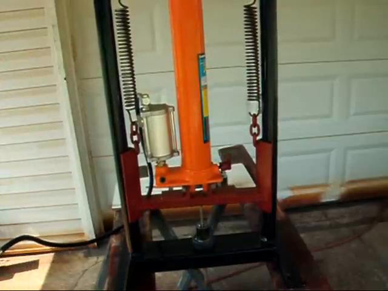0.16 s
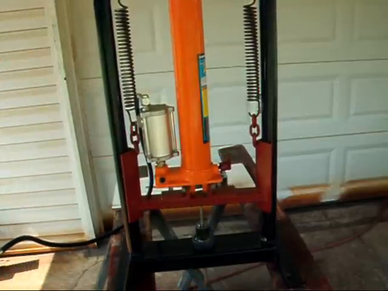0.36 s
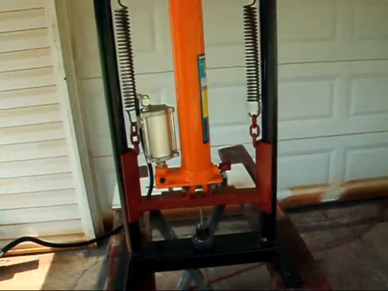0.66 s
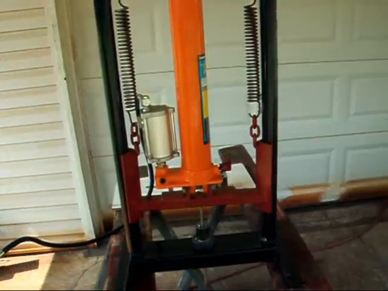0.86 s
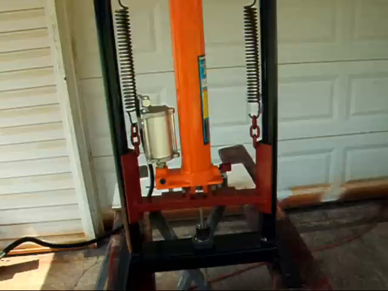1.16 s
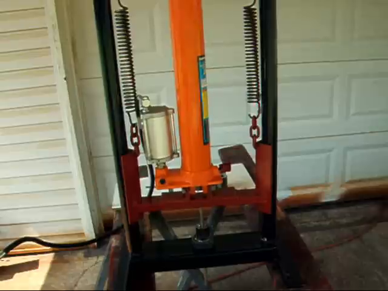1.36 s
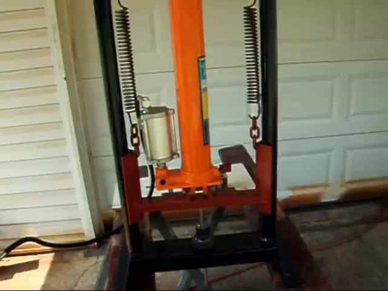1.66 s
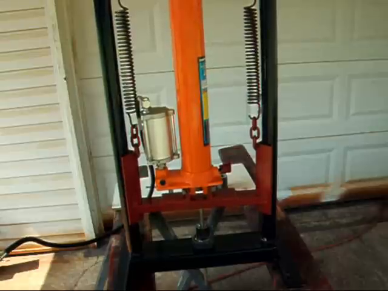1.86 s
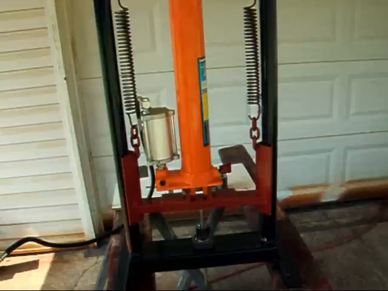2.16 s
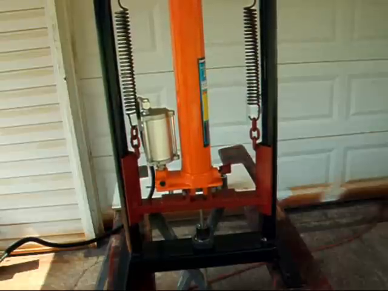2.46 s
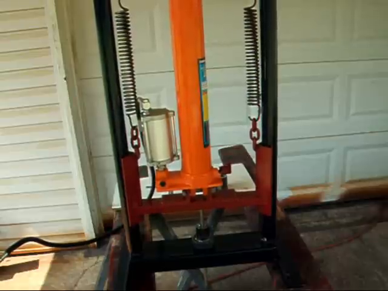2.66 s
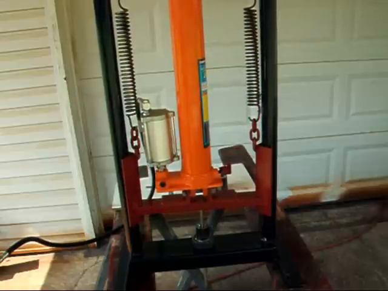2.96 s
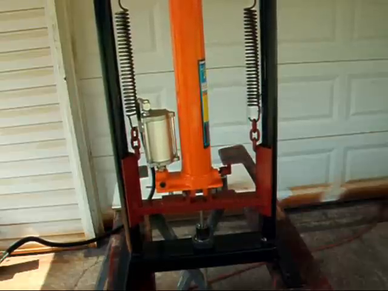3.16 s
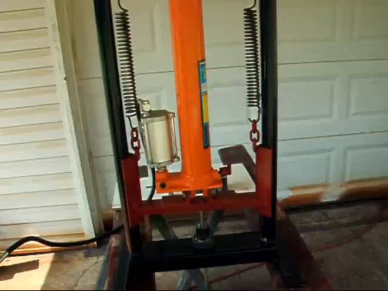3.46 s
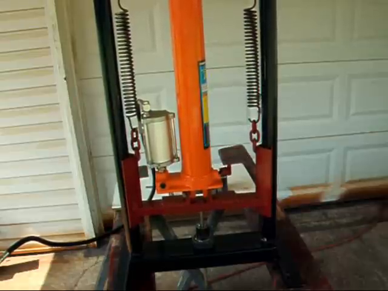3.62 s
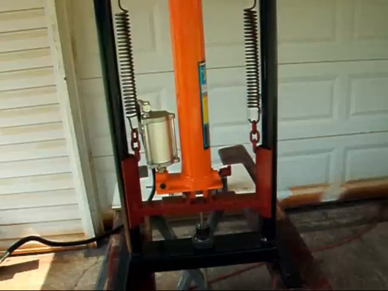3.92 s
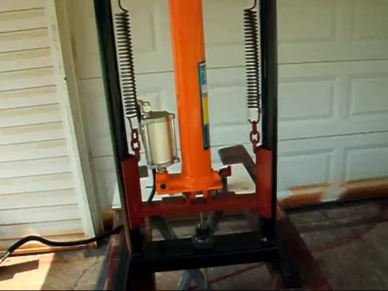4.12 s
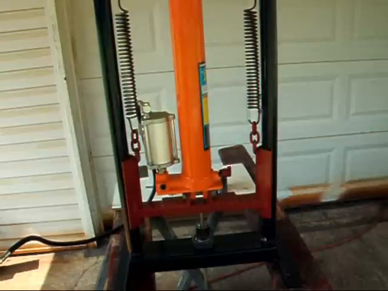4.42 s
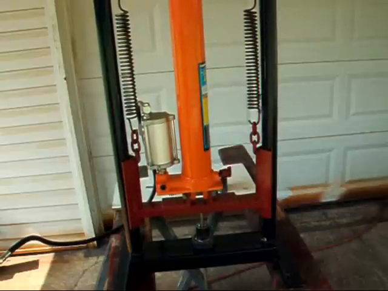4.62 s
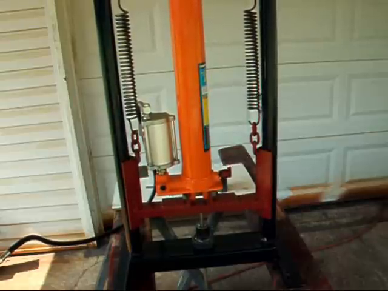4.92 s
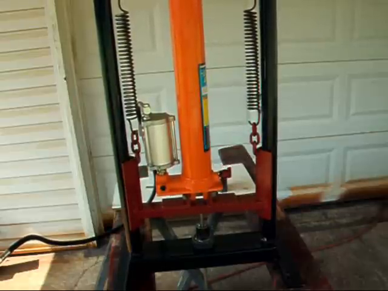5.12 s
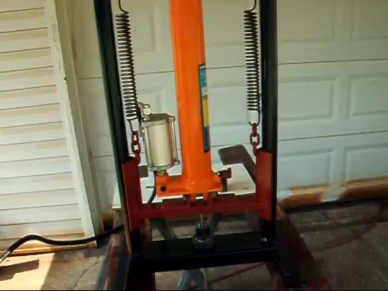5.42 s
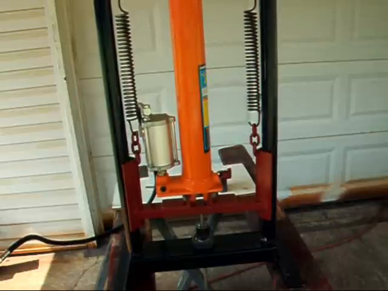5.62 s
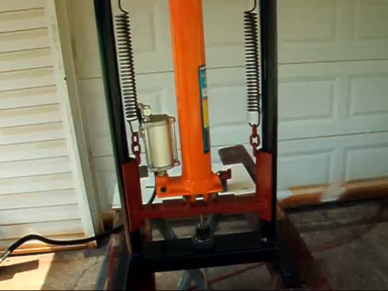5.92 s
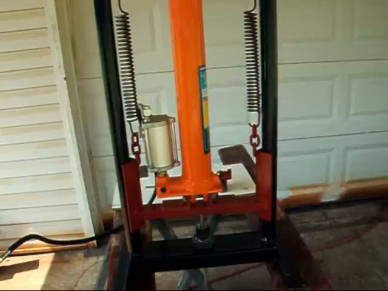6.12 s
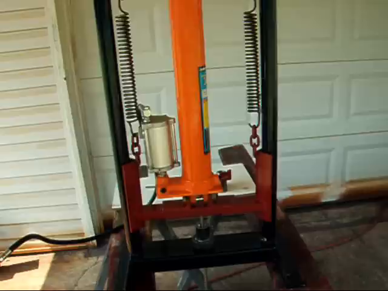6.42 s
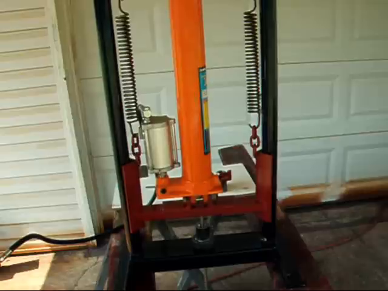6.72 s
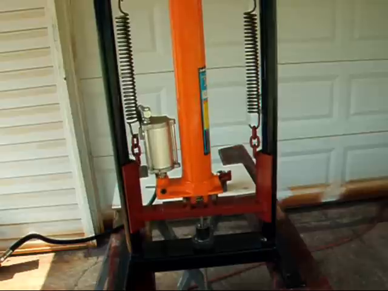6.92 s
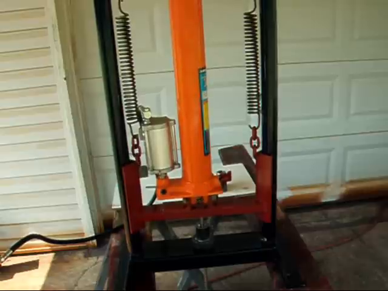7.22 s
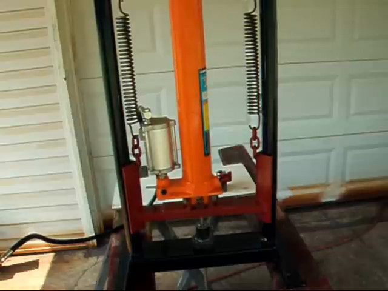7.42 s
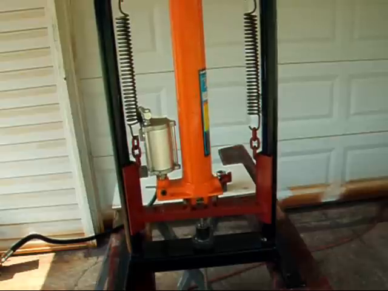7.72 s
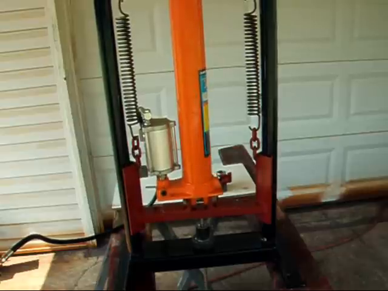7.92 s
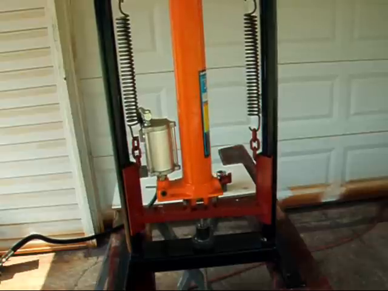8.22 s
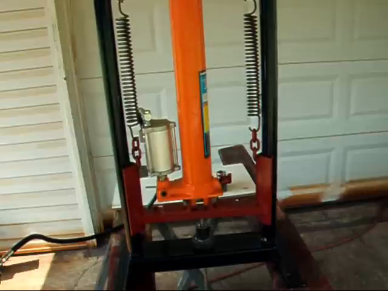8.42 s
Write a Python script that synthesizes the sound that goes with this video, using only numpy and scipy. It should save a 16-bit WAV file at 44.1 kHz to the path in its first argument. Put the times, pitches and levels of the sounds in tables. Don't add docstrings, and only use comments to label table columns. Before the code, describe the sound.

A compressed-air pump rattles along from start to end, a rapid chain of sharp, spitting exhaust puffs. Between puffs come valve clicks, muffled piston thumps on the metal frame and a faint high whistle of incoming air. Some puffs sing with a hollow, mid-high note, others ring sharply higher up. Scattered dull knocks join in. Nearby hard wall and door return brief echoes over faint open-air noise.

```python
import sys
import numpy as np
from scipy import signal
from scipy.fft import rfft, irfft
from scipy.io import wavfile

SR = 44100
rng = np.random.default_rng(int(sys.argv[2]) if len(sys.argv) > 2 else 0)


def volts(x):
    e = np.asarray(x, float) / 20
    return 10 ** e


def wav_out(sig):
    wavfile.write(sys.argv[1], SR, np.round(np.clip(np.atleast_2d(sig).T, -1, 1) * 32767).astype(np.int16))


N = 378333
PAD = SR // 5

# f/Hz, level/dB
YARD_COLOUR = [(15, -40), (50, -22), (100, -10), (140, -14), (300, 4), (600, 5.5), (900, -5.5),
               (1800, -8.5), (2500, -8.5), (3200, -17.5), (4500, -11.5), (8400, -15.5), (12200, -17),
               (16000, -18.5)]
# f/Hz, width/Hz, level/dB
HUM = [(141.5, 9.6, -49.5), (206, 66, -48), (895, 57, -53)]
# t/s, peak level/dB, f/Hz
KNOCKS = [(0.979, -32, 450), (1.409, -29, 740), (1.544, -15.5, 486), (1.877, -19.5, 420), (2.679, -28, 347),
          (3.349, -29, 495), (3.727, -21.5, 455), (3.89, -28, 495), (4.411, -56, 339), (5.585, -24, 613),
          (5.691, -24.5, 552), (5.909, -25, 695), (5.958, -35, 581), (6.143, -22, 713), (6.489, -26, 547),
          (6.891, -25, 250.5), (7.012, -23, 565), (7.519, -23.5, 539), (7.819, -29, 689)]
# t/ms, level/dB
KNOCK_GATE = [(3, -28), (3.5, -19), (8, -3), (29, -3), (49, -11.5), (67, -16)]
# f/Hz, width/Hz, level/dB
INLET_WHISTLES = [(5020, 150, -47), (11000, 260, -53), (6880, 150, -59.5), (9120, 150, -63)]

# stroke number, exhaust opening t/s
PACE = [(0, -0.0831), (3, 0.3387), (6, 0.7631), (11, 1.4741), (14, 1.8915), (18, 2.4454), (21, 2.8552),
        (24, 3.261), (27, 3.6636), (28, 3.7948), (32, 4.3151), (37, 4.969), (41, 5.4942), (45, 6.012),
        (49, 6.5286), (52, 6.9174), (55, 7.3016), (65, 8.5573)]
# t/s, blast level/dB
PRESSURE = [(0, -19), (.7, -18), (1.5, -19.5), (3, -19), (4.2, -17.5), (5.5, -19), (5.9, -17.5), (6.4, -18),
            (6.53, -20.5), (6.7, -18.5), (7.2, -19.5), (8.5, -18)]

# f/Hz, level/dB, T60/s
TICK_MODES = [(3860, -2.5, 0.0072), (2400, -13, 0.0075), (3300, -4, 0.05), (5090, -12, 0.0063),
              (7970, -9, 0.0068), (11250, -6, .008), (420, -39, 0.023), (912, -10, 0.34), (4800, 2, 0.0077)]
# t/ms, gain
TICK_TOUCHES = [(.75, 1.4)]
# t/ms, level/dB
LEAK_GATE = [(0, -36), (-1, 12), (2, 1), (5, -0.5), (31, 4), (25, -28)]
# f/Hz, level/dB
LEAK_COLOUR = [(120, -28), (200, 3), (814, 0.5), (1360, -6.5), (3080, -2), (3830, -5.5), (5720, -5),
               (6270, -12), (7000, -12.5), (13200, -14), (15600, -23)]

# f/Hz, level/dB, T60/s, direction of first swing
THUD_MODES = [(142, -32.8, 0.12, 1), (191, -39.8, 0.166, -1), (224, -32.4, 0.222, -1),
              (263, -29.4, 0.067, -1), (343, -26.0, 0.071, -1), (403, -31.9, 0.177, 1),
              (426, -31.5, 0.067, -1), (556, -25.8, 0.127, 1), (611, -38.3, 0.296, 1),
              (669, -20.6, 0.112, 1), (738, -31.6, 0.214, -1), (800, -44.8, 0.178, -1),
              (897, -38.1, 0.073, -1)]
# t/ms, gain
THUD_ECHOES = [(17.9, -.33), (27.0, -.19)]

# t/ms, level/dB
PORT_GATE = [(-2, -40), (3, 1), (13, 0), (25, -9), (42, -18), (60, -40)]
# t/s, level under the blast/dB
SINGS = [(1.05, -2), (1.19, -4), (1.47, -0.5), (2.03, -5.5), (2.58, -3), (2.86, -12), (3.26, -4),
         (3.66, -7), (3.92, -3.5), (4.58, -2), (4.97, -1), (5.49, -6), (6.01, -4), (6.27, -2.5), (6.53, -3),
         (6.92, -3.5), (7.43, -5.5), (7.68, -2), (7.8, -4)]

# f/Hz, level/dB, T60/s, direction of first swing
POP_MODES = [(104, -11.8, 0.018, -1), (165, -2.3, 0.01, 1), (220, -15.2, 0.04, -1), (261, -31.4, 0.138, -1),
             (348, -34.4, 0.108, -1), (411, -19.6, 0.034, -1), (526, -26.5, 0.076, 1),
             (564, -31.4, 0.116, -1), (681, -26.2, 0.07, -1), (770, -39.1, 0.061, 1)]
# t/ms, gain
POP_ECHOES = [(27.1, .17)]
# t/ms, level/dB
BURST_GATE = [(-15, -40), (0, -22), (-1, -5), (5, 4), (6, -3.5), (10, -15.5), (31, -40)]
# f/Hz, level/dB
BURST_COLOUR = [(410, -39), (700, -6), (1090, -9), (1630, -5.5), (3280, -4.5), (3790, 1), (5170, -3),
                (5660, -9.5), (7340, -9.5), (8700, -11.5), (10600, -13.5), (12500, -11.5), (15600, -40)]
# f at start/Hz, f at end/Hz, width/Hz, level/dB
BURST_PEAKS = [(5640, 5970, 164, 10), (10500, 10100, 410, 5.5), (11600, 10300, 510, -12)]
# t/s, burst edge level/dB, upper port level/dB
ACCENTS = [(.06, 4.5, -6), (.2, 0, 4.5), (.62, -1, 5), (1.19, 2, -2), (2.03, 3, -1.5), (2.17, -2.5, 10),
           (2.72, 1, 7), (3.13, 4, -8), (3.66, -2, 10), (3.92, -2, 7), (4.19, -0.5, 6.5), (4.32, 2, -6),
           (5.49, -1, 9), (6.14, -1, 8.5), (6.27, -2.5, 11), (6.92, 2, 5.5), (7.17, 0.5, 8.5),
           (7.3, 1, 7.5), (7.43, -2, -7), (7.68, 0, 8), (7.8, -3, 10.5), (8.18, 0, 7.5)]
# t/ms, level/dB
BLOWDOWN_GATE = [(-2.5, -42), (2.5, -4), (12.5, -1.5), (24.5, -7.5), (43, -11.5), (56, -16.5), (71, -24),
                 (108, -33)]
# f/Hz, level/dB
BLOWDOWN_COLOUR = [(120, -34), (200, -4), (346, -7), (716, -2.5), (1240, -6), (1540, 0.5), (2180, -7),
                   (2470, -5.5), (2810, -8.5), (3630, -9), (5230, -7.5), (5720, -7.5), (8090, -14.5),
                   (10100, -12), (15600, -19)]
# f/Hz, width/Hz, level/dB
JET_PEAKS = [(2026, 66, -5), (2380, 145, -5), (3730, 170, 1), (5830, 100, 0), (10150, 130, 0),
             (12040, 260, -13)]
# t/ms, level/dB
CREEP_GATE = [(0, -25), (-5.5, -4), (-4, 3), (-7, 0.5), (21, -23)]
# f/Hz, width/Hz, level under the blast/dB
SQUEAL = [(5635, 86, -18.5), (10380, 330, -22.5)]
# t/ms, level/dB
SQUEAL_GATE = [(8, -30), (22, -9), (38, -1.5), (46, -4), (62, -13), (85, -27)]

FAST_MS, LAG_MS, LAG_SLOPE, LEAD_MS, LEAD_SLOPE = 125.5, 39.9, 0.145, 18.5, -0.2
BLAST_SCATTER_DB = 0.3
THUD_DB, THUD_FOLLOWS, THUD_SCATTER_DB = -23.5, 0.45, 0.4
PORT_HZ, PORT_SCATTER_HZ, TONE_DB, TONE_SCATTER_DB = 1626, 59.4, -10.5, 2
SINGING_SPREAD = 0.25
SHARP_START_DB, SHARP_END_DB, SHARP_SCATTER_DB = 0.5, -0.5, 0.9
PEAKS_DB, PEAKS_PER_SHARP, PEAKS_SCATTER_DB = 0.5, -2.3, 4.5
DOOR_MS, DOOR_DB, DOOR_CUT_HZ = 24.8, -12, 213


def table(rows):
    return np.array(rows, float).T


def rms_one(x):
    return x / np.sqrt(np.mean(x ** 2) + 1e-20)


def coloured(spectrum, grit_db=0.):
    hz, db = table(spectrum)
    white = rng.standard_normal(N) * volts(grit_db * rng.standard_normal(N))
    axis = np.maximum(np.fft.rfftfreq(N, 1 / SR), 1)
    gain = volts(np.interp(np.log(axis), np.log(hz), db))
    return rms_one(irfft(rfft(white) * gain, N))


def resonance(x, hz, width_hz):
    r = np.exp(-np.pi * width_hz / SR)
    zeros = (1 - r * r) / 2 * np.array([1, 0, -1])
    poles = [1, -2 * r * np.cos(2 * np.pi * hz / SR), r * r]
    return signal.lfilter(zeros, poles, x)


def narrow_noise(lines):
    out = 0
    for hz, width_hz, db in lines:
        once = resonance(rng.standard_normal(N), hz, width_hz)
        out = out + volts(db) * rms_one(resonance(once, hz, 1.27 * width_hz))
    return out


def repeat(times, dbs, shape, lead=0):
    train = np.zeros(N + 2 * PAD)
    np.add.at(train, np.round(times * SR).astype(int) + PAD - lead, volts(dbs))
    return signal.fftconvolve(train, shape)[PAD:PAD + N]


def gate(times, dbs, points):
    ms, db = table(points)
    steps = np.arange(round(ms[0] * SR / 1000), round(ms[-1] * SR / 1000))
    envelope = volts(np.interp(steps * 1000 / SR, ms, db))
    return repeat(times, dbs, envelope, lead=-steps[0])


def struck(modes, echoes=()):
    hz, db, t60, *swing = table(modes)
    t = np.arange(PAD)[:, None] / SR
    side = np.sign(swing[0]) if swing else (-1) ** np.arange(len(hz))
    decay = volts(db - 60 * t / t60)
    direct = (side * decay * np.sin(2 * np.pi * hz * t)).sum(axis=1)
    out = direct.copy()
    for ms, gain in echoes:
        lag = round(ms * SR / 1000)
        out[lag:] += gain * direct[:-lag]
    return out


def strokes():
    number, at = table(PACE)
    s = np.interp(np.arange(number[-1] + 1), number, at)
    longer_ms = 1000 * np.gradient(s) - FAST_MS
    lag = (LAG_MS + LAG_SLOPE * longer_ms) / 1000
    lead = (LEAD_MS + LEAD_SLOPE * longer_ms) / 1000
    return s, lag, lead


def per_stroke(values):
    return values[np.searchsorted(strokes()[0] - 0.01, np.arange(N) / SR) - 1]


def nearest_stroke(at):
    return np.abs(strokes()[0][:, None] - at).argmin(axis=0)


def blast_levels():
    s = strokes()[0]
    return np.interp(s, *table(PRESSURE)) + BLAST_SCATTER_DB * rng.standard_normal(len(s))


def yard():
    return volts(-39.0) * coloured(YARD_COLOUR) + narrow_noise(HUM)


def surroundings(x):
    t = np.arange(2 * PAD) / SR
    tail = rng.standard_normal(len(t)) * volts(-60 * t / 0.25) * (t > 0.012)
    tail = signal.lfilter([1], [1, -0.6], tail)
    return signal.fftconvolve(x, tail / np.sqrt(np.sum(tail ** 2)))[:N]


def distant_knocks():
    out, span = np.zeros(N), PAD // 2
    rattle = rng.standard_normal((len(KNOCKS), span))
    ms, gate_db = table(KNOCK_GATE)
    shape = volts(np.interp(np.arange(span) * 1000 / SR + ms[0], ms, gate_db))
    for (s, db, hz), noise in zip(KNOCKS, rattle):
        broad = rms_one(resonance(resonance(noise, 380, 560), 420, 610))
        body = rms_one(resonance(noise, hz, 130))
        i = round(s * SR)
        out[i:i + span] += volts(db - 9) * shape * (broad + volts(-2.5) * body)
    return out


def inlet():
    s, t = strokes()[0], np.arange(N) / SR
    knots = np.ravel(np.transpose([s, s + 0.012, s + 0.045, s + 0.081]))
    swell_db = np.interp(t, knots, np.tile([2.5, -8, -26, 2.5], len(s)))
    return volts(swell_db - 0.1 - 0.12 * t) * narrow_noise(INLET_WHISTLES)


def pilot_valve():
    s, _, lead = strokes()
    at, growth_db = s - lead, 0.28 * s
    tick_db = growth_db - 32.5 + rng.normal(0, 0.96, len(s))
    tick = repeat(at, tick_db, struck(TICK_MODES, TICK_TOUCHES))
    leak = gate(at, growth_db - 34.0, LEAK_GATE) * coloured(LEAK_COLOUR, grit_db=-0.5)
    return tick + leak


def piston(blast_db):
    s, lag, _ = strokes()
    follow_db = THUD_FOLLOWS * (blast_db - blast_db.mean())
    thud_db = THUD_DB + follow_db + THUD_SCATTER_DB * rng.standard_normal(len(s))
    return repeat(s + lag, thud_db + 24.3, struck(THUD_MODES, THUD_ECHOES))


def port_tone(blast_db):
    s = strokes()[0]
    tone_db = TONE_DB + TONE_SCATTER_DB * rng.standard_normal(len(s))
    off_hz = PORT_SCATTER_HZ * rng.standard_normal(len(s))
    at, sung_db = table(SINGS)
    singing = nearest_stroke(at)
    tone_db[singing] = sung_db
    off_hz[singing] = SINGING_SPREAD * off_hz[singing]
    phase = 2 * np.pi * np.cumsum(per_stroke(PORT_HZ + off_hz)) / SR
    steady = np.sqrt(2) * np.sin(phase)
    rough = narrow_noise([(1615, 360, -0.5)])
    return gate(s, blast_db + tone_db - 4.5, PORT_GATE) * (steady + rough)


def burst_air(blast_db):
    s = strokes()[0]
    sharp_db = np.linspace(SHARP_START_DB, SHARP_END_DB, len(s))
    sharp_db = sharp_db + SHARP_SCATTER_DB * rng.standard_normal(len(s))
    peaks_db = PEAKS_DB + PEAKS_PER_SHARP * sharp_db + PEAKS_SCATTER_DB * rng.standard_normal(len(s))
    at, edge_db, upper_db = table(ACCENTS)
    accented = nearest_stroke(at)
    sharp_db[accented], peaks_db[accented] = edge_db, upper_db
    raw = gate(s, blast_db + sharp_db - 0.5, BURST_GATE) * coloured(BURST_COLOUR, grit_db=5.0)
    into_port, burst = raw * volts(per_stroke(peaks_db)), raw
    load = np.arange(N) / N
    for start_hz, end_hz, width_hz, db in BURST_PEAKS:
        early = resonance((1 - load) * into_port, start_hz, width_hz)
        late = resonance(load * into_port, end_hz, width_hz)
        burst = burst + volts(db) * (early + late)
    return burst


def blow_down(blast_db):
    blow = gate(strokes()[0], blast_db, BLOWDOWN_GATE) * coloured(BLOWDOWN_COLOUR, grit_db=4.0)
    return blow + sum(volts(db) * resonance(blow, hz, width_hz) for hz, width_hz, db in JET_PEAKS)


def exhaust_pop():
    s = strokes()[0]
    pop_db = 0.75 + 0.38 * rng.standard_normal(len(s))
    pop = repeat(s, pop_db, struck(POP_MODES, POP_ECHOES))
    bass = signal.sosfilt(signal.butter(2, DOOR_CUT_HZ, fs=SR, output="sos"), pop)
    return pop + volts(DOOR_DB) * np.roll(bass, round(DOOR_MS * SR / 1000))


def exhaust(blast_db):
    s = strokes()[0]
    blast = volts(-1.0) * (burst_air(blast_db) + blow_down(blast_db))
    creep = gate(s, blast_db - 23 + 0.77 * s, CREEP_GATE) * coloured(BURST_COLOUR)
    squeal = gate(s, blast_db, SQUEAL_GATE) * narrow_noise(SQUEAL)
    return blast + creep + squeal + exhaust_pop()


def scene():
    blast_db = blast_levels()
    air = exhaust(blast_db) + port_tone(blast_db) + pilot_valve()
    blows = piston(blast_db) + distant_knocks()
    echoes = surroundings(volts(-15.5) * air + volts(-30.0) * blows)
    return (air + blows + echoes + inlet() + yard())[None]


def top_cut(x):
    return signal.sosfilt(signal.butter(12, 16150, fs=SR, output="sos"), x)


def record(dry):
    offset, ceiling = 0.0038, 0.95
    top = signal.ellip(12, 0.5, 75, 15600, fs=SR, output="sos")
    bass = signal.butter(2, 42, "high", fs=SR, output="sos")
    rounded = ceiling * np.tanh(dry / ceiling)
    mix = signal.sosfilt(np.vstack([top, bass]), rounded) + offset
    return top_cut(mix)


dry = scene()
out = record(dry)
wav_out(out)
```